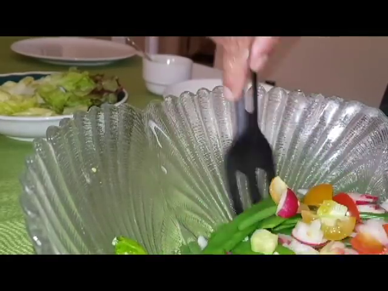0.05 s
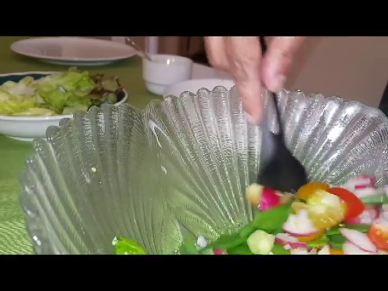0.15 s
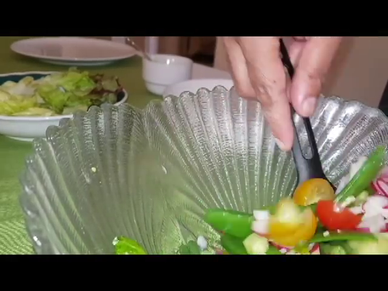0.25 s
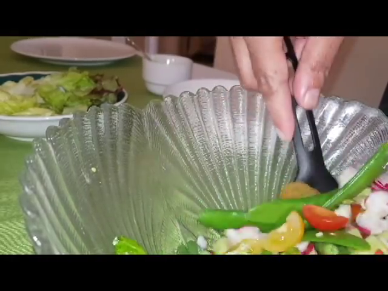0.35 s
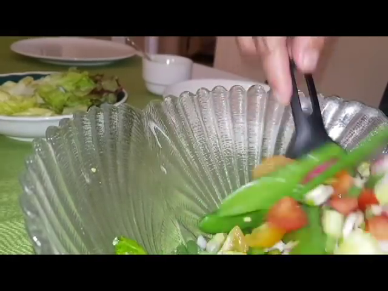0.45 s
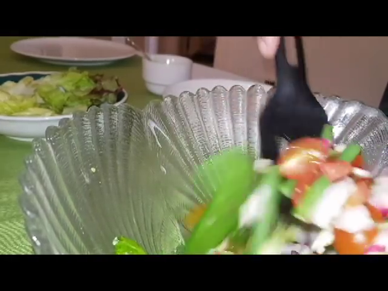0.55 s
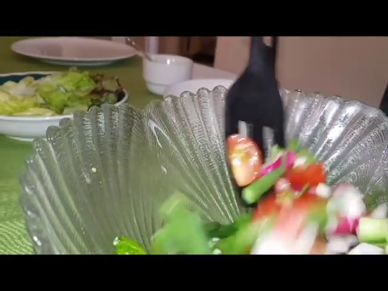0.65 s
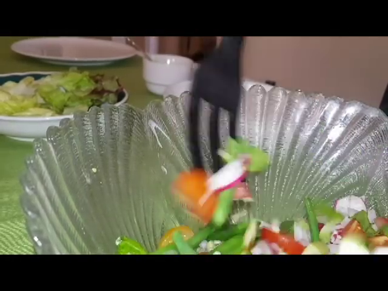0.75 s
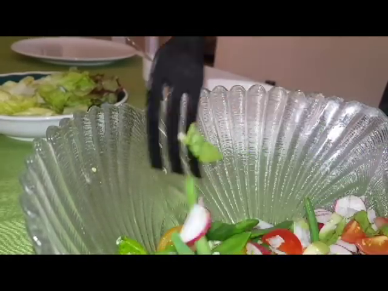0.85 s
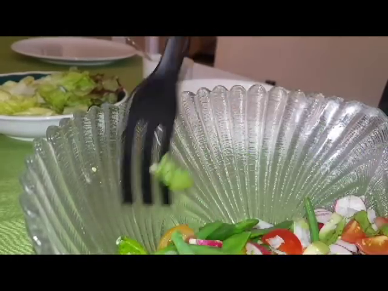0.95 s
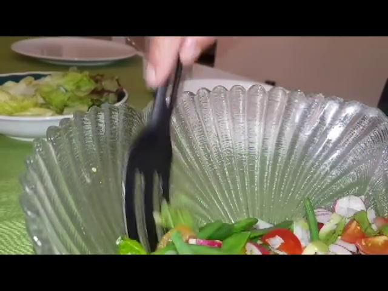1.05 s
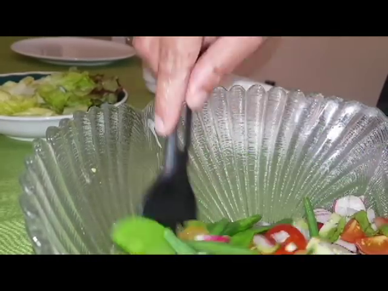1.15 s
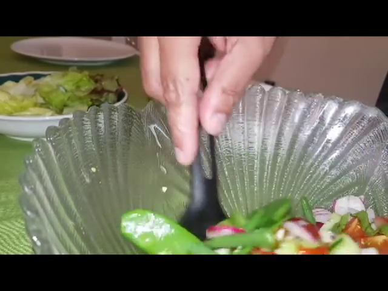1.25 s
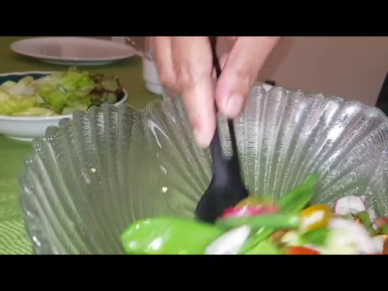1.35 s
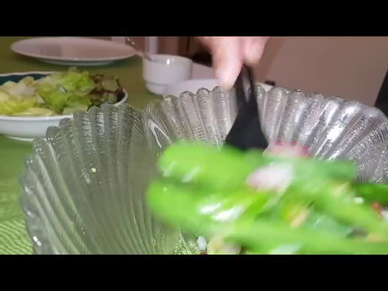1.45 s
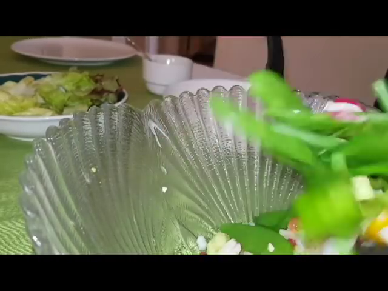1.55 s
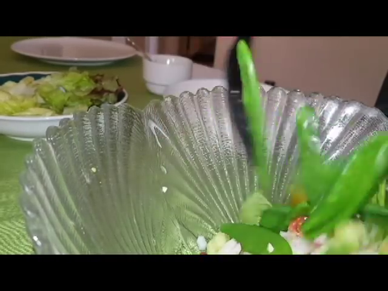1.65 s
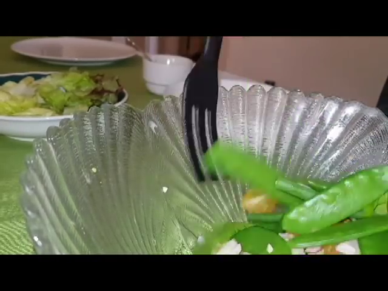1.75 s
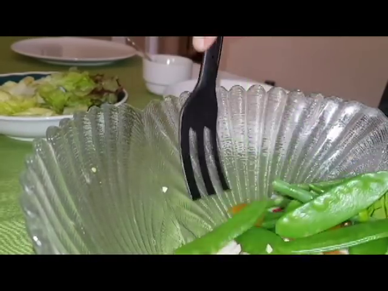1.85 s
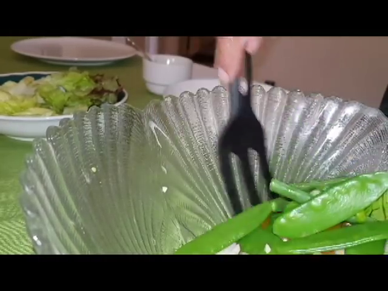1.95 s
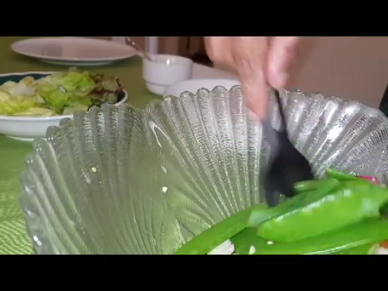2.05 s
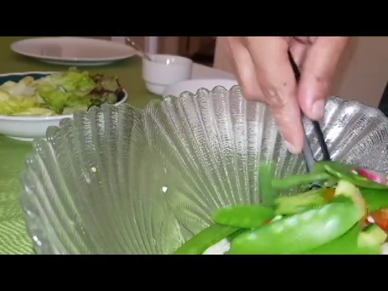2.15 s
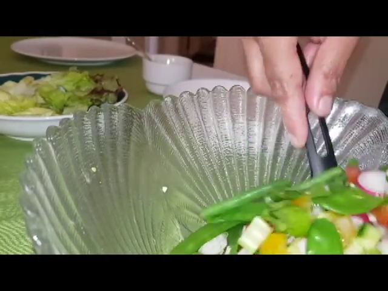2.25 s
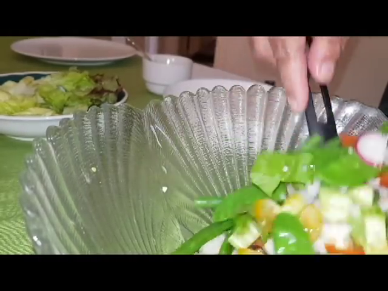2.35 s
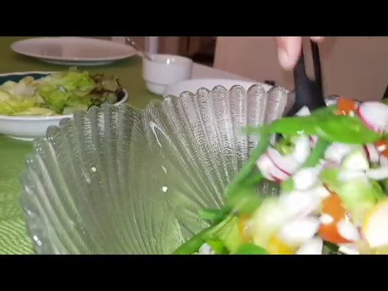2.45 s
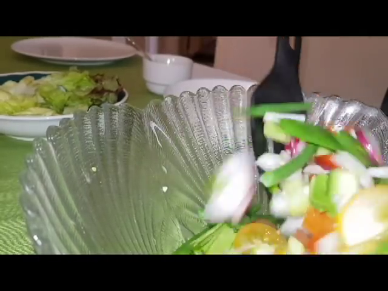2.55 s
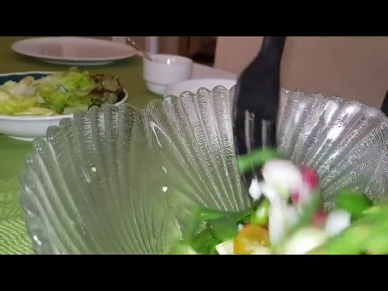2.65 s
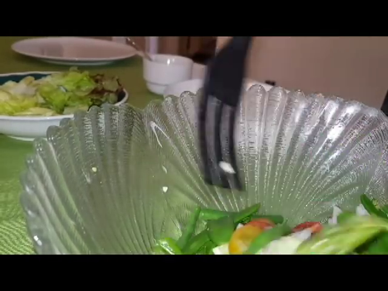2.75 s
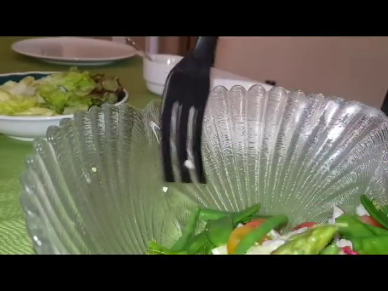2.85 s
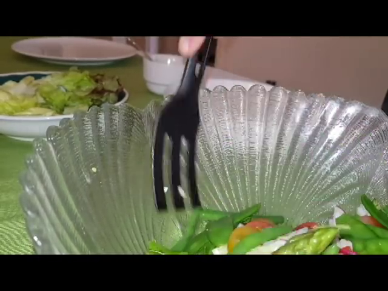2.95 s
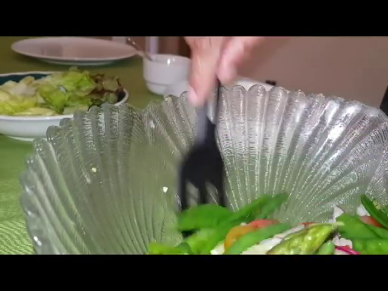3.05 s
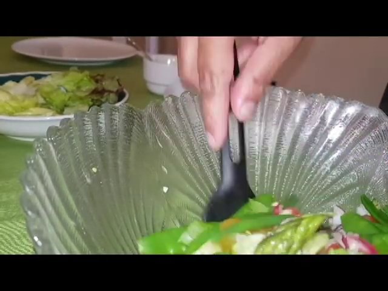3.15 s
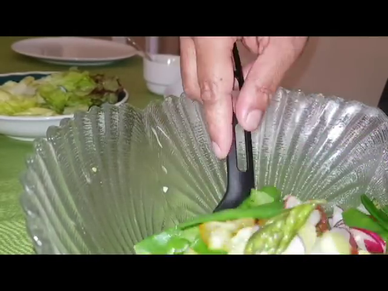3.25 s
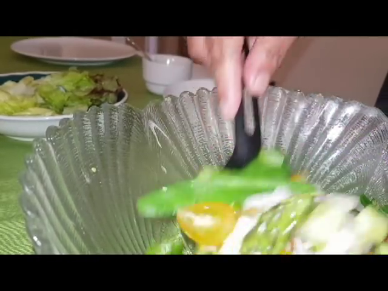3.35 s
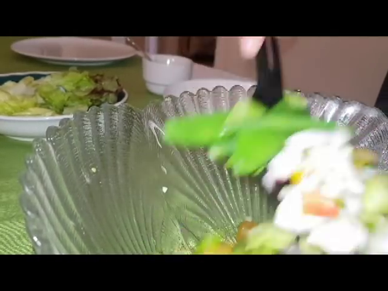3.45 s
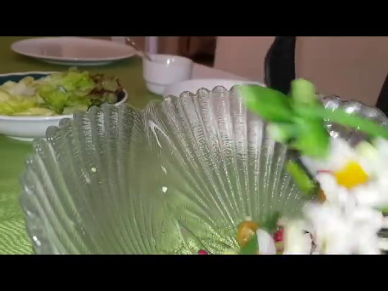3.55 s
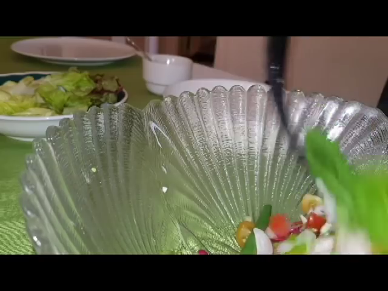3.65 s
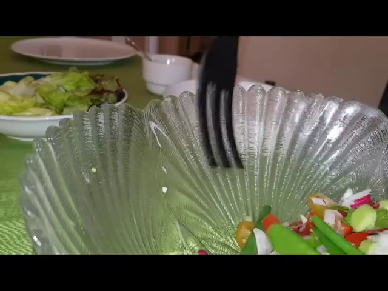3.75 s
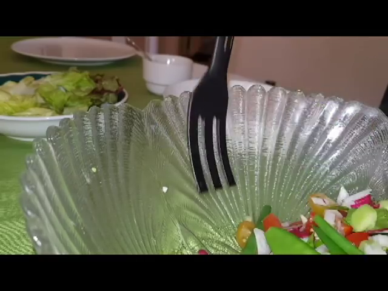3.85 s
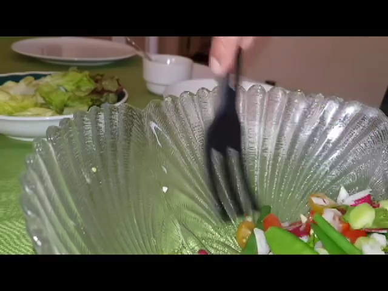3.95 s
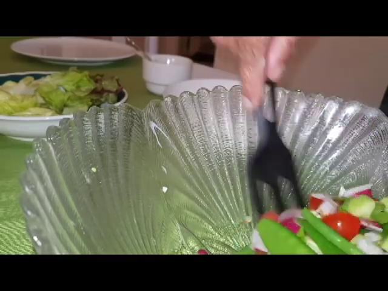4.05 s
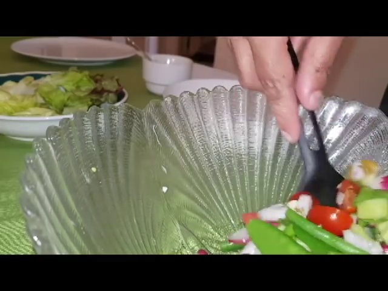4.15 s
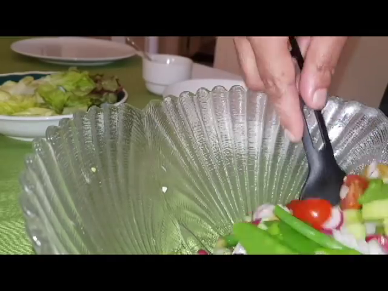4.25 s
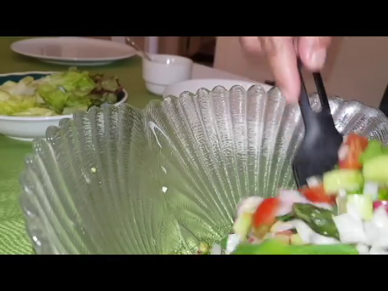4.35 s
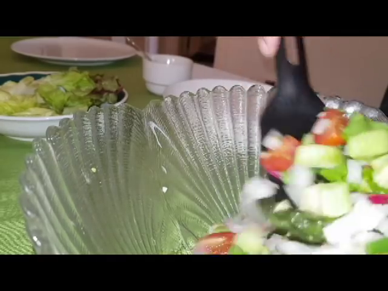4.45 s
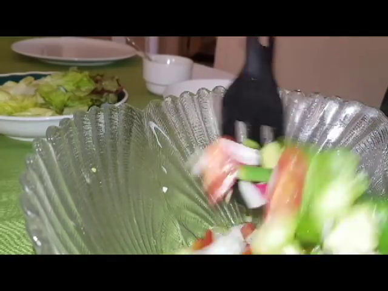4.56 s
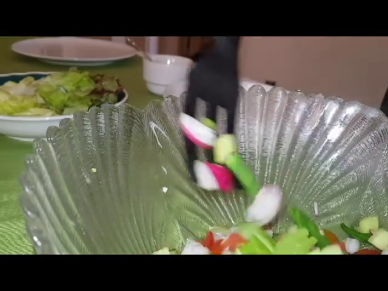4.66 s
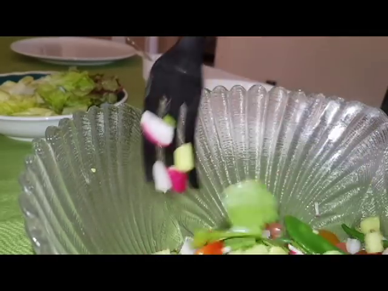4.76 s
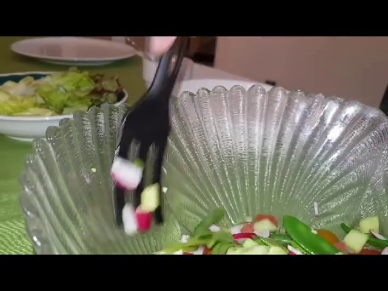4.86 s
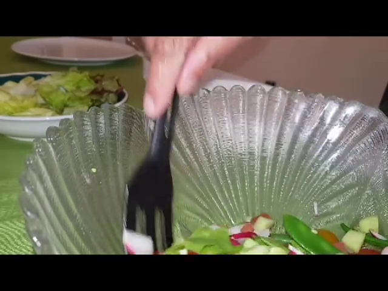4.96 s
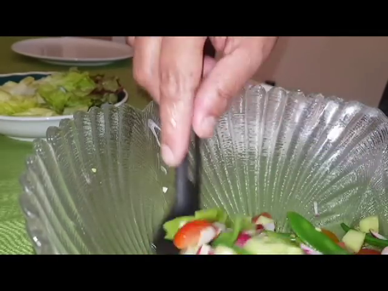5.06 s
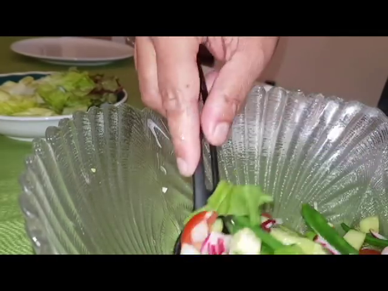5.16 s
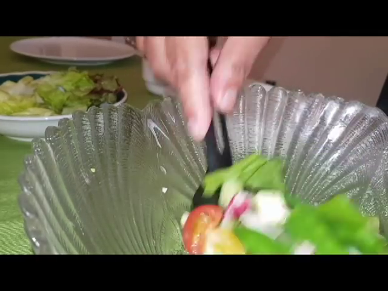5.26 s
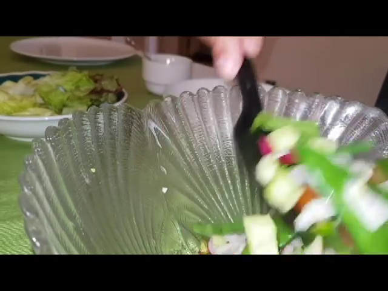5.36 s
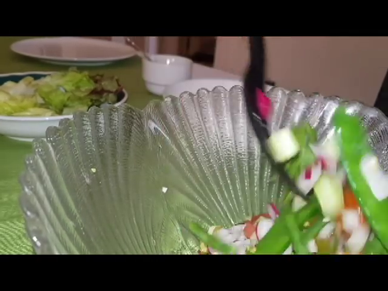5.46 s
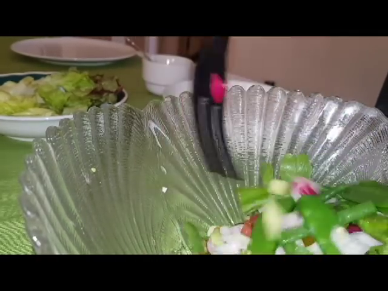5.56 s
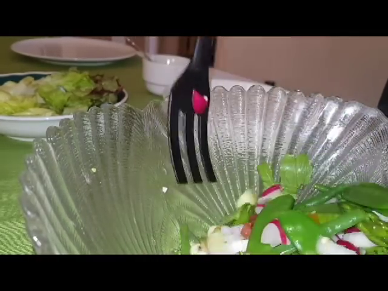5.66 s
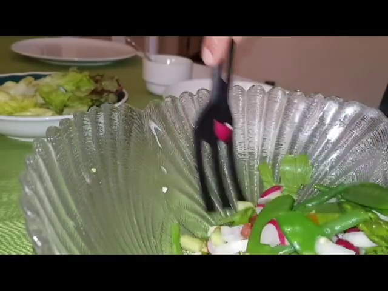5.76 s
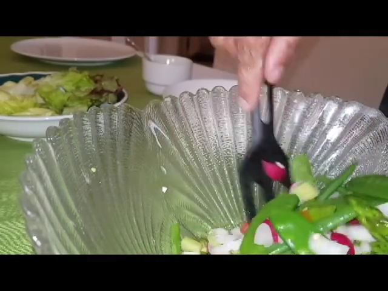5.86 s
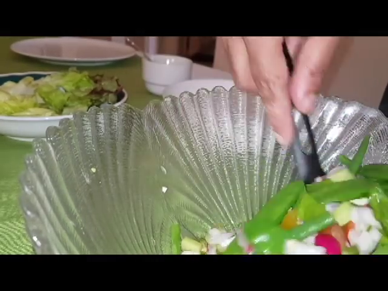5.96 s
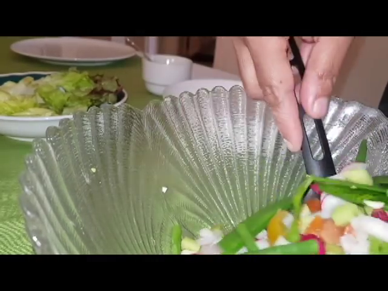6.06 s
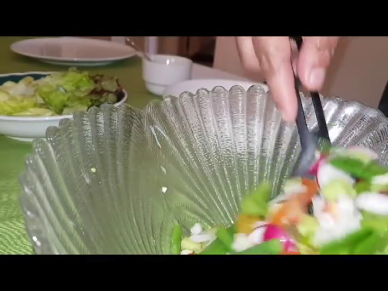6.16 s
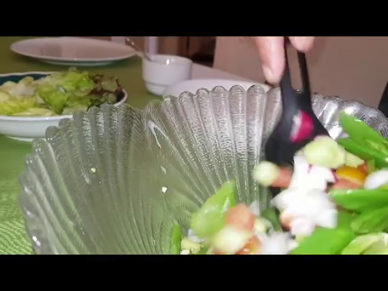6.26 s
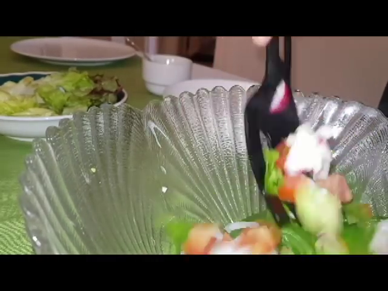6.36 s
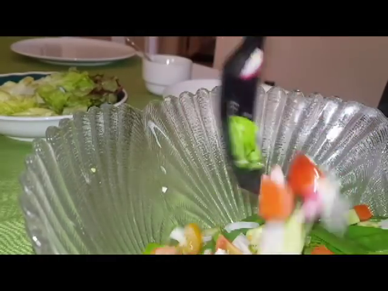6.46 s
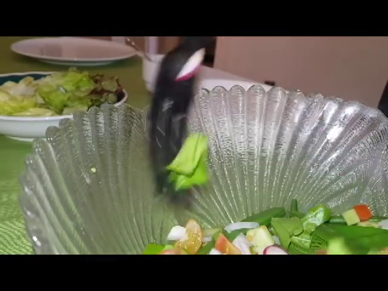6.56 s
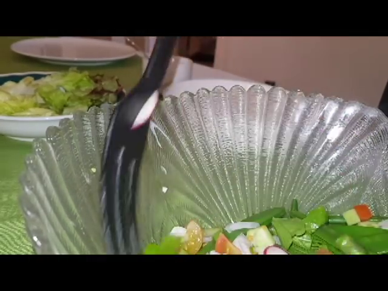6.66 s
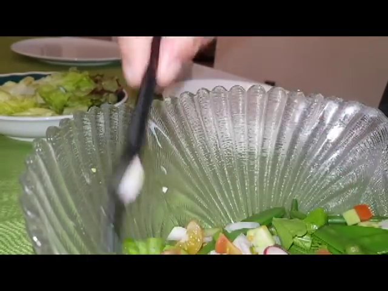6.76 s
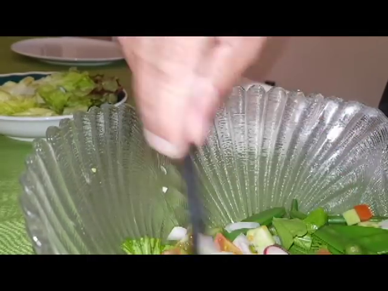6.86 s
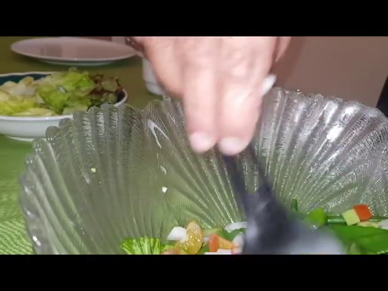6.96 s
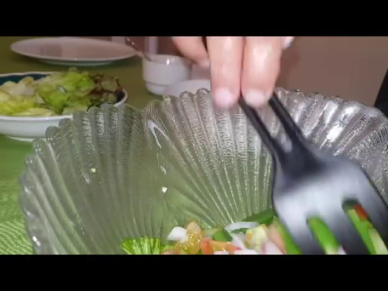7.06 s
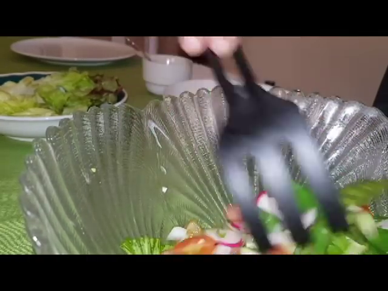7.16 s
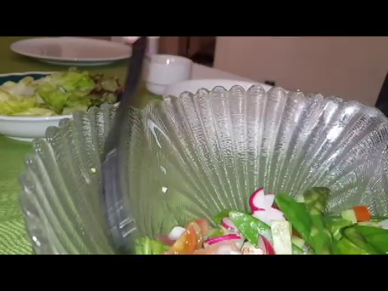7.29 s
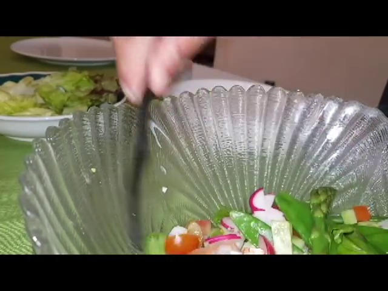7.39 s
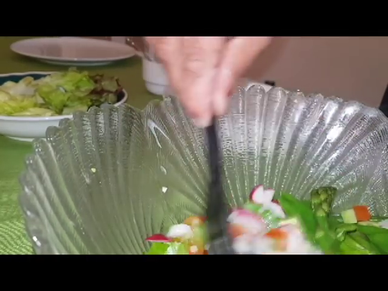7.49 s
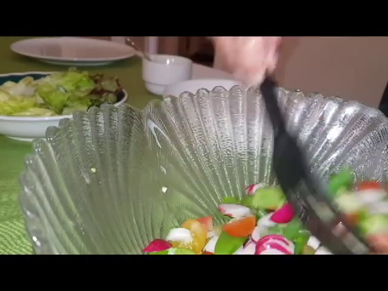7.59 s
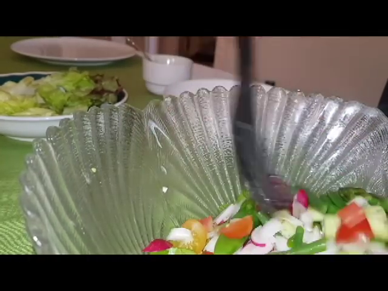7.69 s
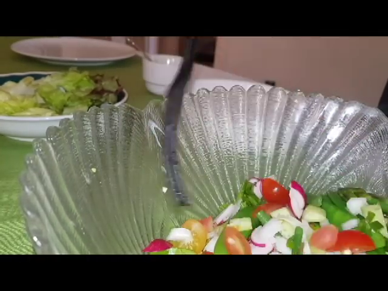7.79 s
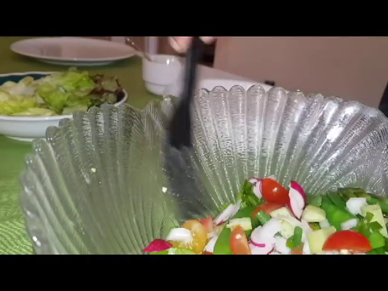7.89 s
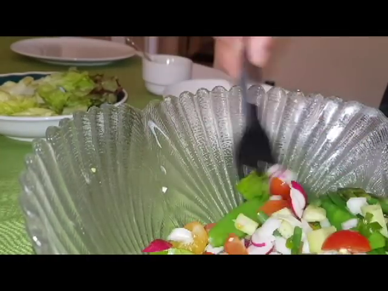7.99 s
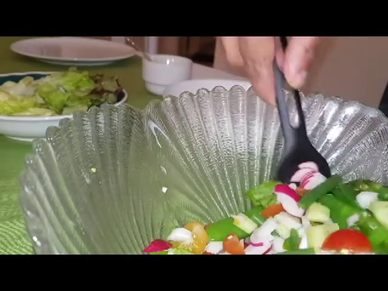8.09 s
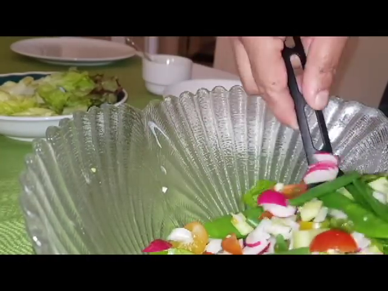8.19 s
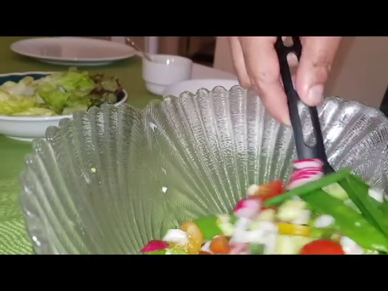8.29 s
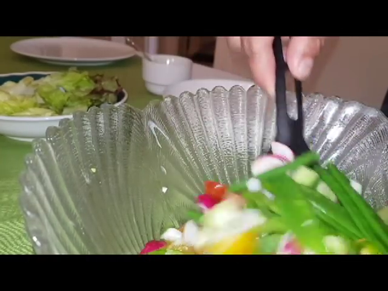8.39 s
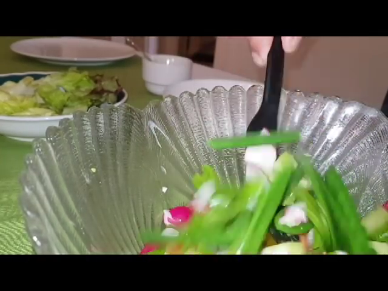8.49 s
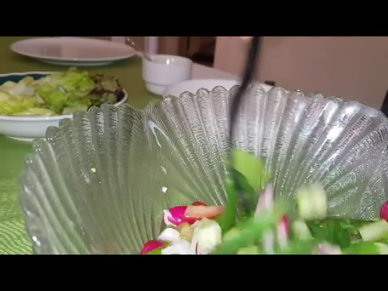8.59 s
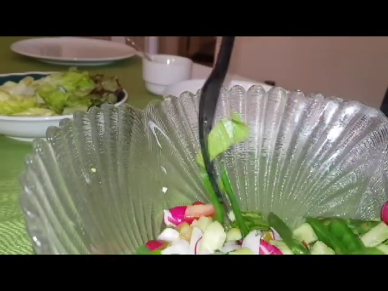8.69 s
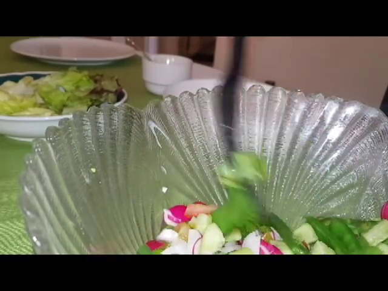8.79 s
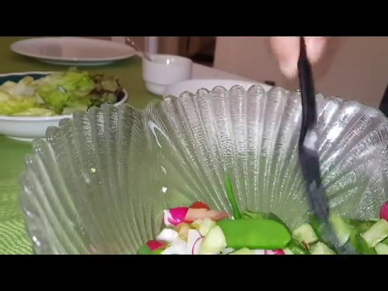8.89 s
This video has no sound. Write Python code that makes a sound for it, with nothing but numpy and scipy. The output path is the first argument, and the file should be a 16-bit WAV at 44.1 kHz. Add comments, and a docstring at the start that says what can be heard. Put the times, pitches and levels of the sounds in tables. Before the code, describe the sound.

A plastic fork tosses wet raw vegetables in a ribbed glass bowl, close to stereo microphones in a small kitchen with a low wavering hum and faint hiss. It opens mid-stroke with rustle, scraping and light ticks until 0.3 s, then soft falling pieces. At 1.0 s the fork knocks the glass and digs, with a dull tap at 1.3. Sharper double clinks at 1.85 s ring the bowl; pieces tumble to 2.7. A strong clack and ring comes at 2.95 s, others at 3.9, with a crisp snap at 4.17. More strokes follow at 4.88 and 5.72 s, each with crunchy rustle, ticks and soft thuds. The stroke at 6.78 s is faint. Clicks at 7.37 and 7.4 lead to clinks at 7.8 and 7.9 s, the last ringing brightest, then rustle and muffled drops near 8.5 s fade into hum.

```python
"""A plastic salad fork tosses raw vegetables in a ribbed glass bowl, close to a camera with two microphones.
Fork and hard pieces click on the glass: noise bursts, short resonances and brief upper glass modes.
Firm blows ring the bowl as decaying sines in beating pairs.
Wet vegetables thud, scrape and rustle as grainy filtered noise; the kitchen gives a low hum,
a faint hiss and a short echo of the contacts."""
import sys
import numpy as np
from scipy import signal
from scipy.fft import rfft, irfft, next_fast_len
from scipy.io import wavfile
from scipy.ndimage import uniform_filter1d, map_coordinates

SR = 44100
rng = np.random.default_rng(int(sys.argv[2]) if len(sys.argv) > 2 else 0)


def inscribe(sig):
    """Save sig as 16-bit PCM at rate SR to the path in sys.argv[1].

    A 1-D sig is mono; a 2-D sig holds one channel per row.
    Samples are clipped to [-1, 1] before scaling.
    """
    pcm = np.round(np.clip(np.atleast_2d(sig).T, -1, 1) * 32767)
    wavfile.write(sys.argv[1], SR, pcm.astype(np.int16))


N = 393813

# modes of the glass bowl, low to high: [pitch_hz]
BOWL_HZ = np.array([322, 736.5, 1281, 1339, 1998, 2774, 2832, 3698, 4689, 12110])
# how each mode rings, with its close twin: [t60_s, left_minus_right_db, left_lead_rad,
# twin_offset_hz, twin_left_db, twin_right_db], twin levels relative to the mode
BOWL_MODES = [(1.6, 2.5, 1.66, -26.5, -2.5, -2.5), (2.07, -7, 4, 7, -2, -9),
              (1.2, 2.5, 2.16, 2, -31.5, -32), (1.06, 6.5, -1.1, 3.5, -31.5, -29.5),
              (0.83, 4, 2, 7, -12, -8.5), (0.57, 7.5, -0.8, -12.5, -32.5, -29),
              (0.52, -3.5, 1.3, -1.5, -28.5, -26), (0.37, 5, -1.07, 18, -13, -8),
              (0.15, 1, 8.5, 25.5, -15.5, -14), (0.064, -1.5, 1.5, 28.5, -16, -26)]


def amp(db):
    """Decibels to amplitude."""
    return 10 ** (np.asarray(db) / 20)


def unit(x):
    """Scale to an rms of 1."""
    return x / np.sqrt(np.mean(x ** 2) + 1e-20)


def along(points, hz):
    """Interpolate (Hz, value) points on a log frequency axis."""
    f, v = np.transpose(points)
    return np.interp(np.log(hz + 1), np.log(f + 1), v)


def curves(rows):
    """One value per sample for each column after the time."""
    s, *cols = np.transpose(rows)
    return [np.interp(np.arange(N) / SR, s, c) for c in cols]


def wobble(rate):
    """A smooth random curve, rate knots a second."""
    knots = rng.standard_normal(int(N * rate / SR) + 4)
    return map_coordinates(knots, [np.arange(N) * rate / SR])


def filtered(x, response):
    """Filter x by a complex response of frequency."""
    m = next_fast_len(x.shape[-1] + 8192)
    spectrum = rfft(x, m) * response(np.fft.rfftfreq(m, 1 / SR))
    return irfft(spectrum, m)[..., :x.shape[-1]]


def resonance(hz, width_hz):
    """Response of one damped mode, 1 at its peak."""
    return lambda f: 1j * f * width_hz / (hz * hz - f * f + 1j * f * width_hz)


def sides(db):
    """Left and right gains for a level difference."""
    return amp([[db / 2], [-db / 2]])


def grainy(per_second, spread_db, share, patchy_db):
    """Stereo noise of rms 1 in patches of random gain, with sparse spikes of very unequal size in it."""
    spikes = (rng.random(N) < per_second / SR) * amp(spread_db * rng.exponential(size=N))
    puff = amp(-60 * np.arange(200) / SR / 0.0042)  # t60 4.2 ms
    puffs = signal.fftconvolve(spikes, puff)[:N]
    noise = rng.standard_normal((2, N)) * (1 + share * unit(puffs))
    z = signal.stft(noise, nperseg=256)[2]
    # random gains, smoothed over frequency and then time
    field = uniform_filter1d(rng.standard_normal(z.shape[1:]), size=12, axis=0)
    field = uniform_filter1d(field, size=4, axis=1)
    return unit(signal.istft(z * amp(patchy_db * unit(field)), nperseg=256)[1][:, :N])


def bowl():
    """Each blow starts all modes afresh and chokes what rang before; close twins make the ring beat."""
    # blows that ring the bowl: [start_s, strength_db, hardness_db_per_octave, place_round_rim_deg,
    # top_mode_db, damping_by_food (1 = usual), sense (start of the 2832 Hz mode: 1 upright, -1 inverted)]
    blows = [(0, -47.5, 6.1, 22.6, -77, 1.34, 1), (1.003, -40.5, 2.5, 17, -53, 0.82, 1),
             (1.847, -39.5, 6.8, -11.5, -42, 1.4, 1), (1.872, -38, 7.4, -35.5, -30, 1.34, 1),
             (2.951, -31, 8.9, -30.5, -40, 0.83, -1), (3.882, -34.5, 10.7, -5.8, -69, 1.04, 1),
             (3.931, -46, 3.8, 17.5, -63, 1.7, 1), (4.876, -40.5, 4.6, 16, -30, 0.9, 1),
             (5.726, -34.5, 2.1, 36, -45, 1.23, 1), (6.776, -56.5, 15.3, -31.5, -52, 1.04, 1),
             (7.366, -55, 3.7, -3, -40.5, 1.2, 1), (7.397, -40.5, 7.4, -11.5, -56, 1.16, 1),
             (7.795, -38.5, 8.6, -6.6, -60, 1.1, -1), (7.898, -27.5, 9.7, 32.5, -10, 1.19, -1)]
    # vibration pattern of each mode but the top one: [waves_round_rim, turn_deg, even_blow_db]
    patterns = [(2, 162, 3.5), (3, 27, 0), (4, 40, -4), (4, 49.5, -2.5), (5, 77, -1.5), (6, 75, -0.5),
                (6, 74.6, -0.5), (7, 56, 4), (8, 39, 3.5)]
    node_db = -25  # what is left of a mode struck on its node

    out, hz = np.zeros((2, N)), BOWL_HZ[:, None]
    t60, pan_db, lead, split, *twin_db = np.array(BOWL_MODES).T[:, :, None]
    waves, pattern, even_db = np.transpose(patterns)
    # a mode radiates in lobes, unequal at the two microphones: the left one's share of the power
    left = 1 / (1 + 1 / amp(pan_db) ** 2)
    food = np.array([wobble(30) for _ in BOWL_MODES])  # pieces touching the wall unsettle each mode
    starts = [round(max(row[0], 0) * SR) for row in blows] + [N]
    for (s, db, hardness, place, top_db, damping, sense), a, b in zip(blows, starts, starts[1:]):
        angle = np.radians(np.round(waves) * place - pattern)
        swing = np.hypot(np.cos(angle), amp(node_db))
        struck_db = db + even_db + hardness * np.log2(BOWL_HZ[:-1] / 2000)
        start = np.append(amp(struck_db) * swing, amp(top_db))
        t = np.arange(min(b - a, SR)) / SR  # one second at most
        # food slides back onto the glass and smothers the high tails first
        lost_db = 60 * damping * t / t60 + hz / 50 * t ** 2
        shaky_db = 1.2 * food[:, a:a + len(t)]
        onset = 1 - np.exp(-t / 0.0022)
        fade = start[:, None] * amp(shaky_db - lost_db) * onset
        fade *= np.where(hz == BOWL_HZ[6], np.sign(sense), 1)
        for ear, share, turn, twin in zip(out, (left, 1 - left), (lead / 2, -lead / 2), twin_db):
            mode = np.sin(2 * np.pi * hz * t + turn)
            pair = mode + amp(twin) * np.sin(2 * np.pi * (hz + split) * t + turn)
            ear[a:a + len(t)] = np.sum(np.sqrt(2 * share) * fade * pair, 0)
    return out


def stirring():
    """Levels in dB of thuds, prongs and rustle: strokes start at once, sag, release; tumbles swell and die."""
    # the fork digs under the heap: [start_s, length_s, thuds_at_start_db, prongs_at_start_db,
    # prongs_at_end_db, rustle_at_start_db]
    strokes = [(-0.1, 0.086, -50, -54, -56, -43.5), (1.003, 0.25, -51, -67, -50, -46),
               (1.852, 0.27, -57, -56, -53.5, -47.5), (2.947, 0.23, -50, -59, -51.5, -45),
               (3.892, 0.33, -57.5, -76, -46, -53), (4.879, .2, -50.5, -61.5, -61, -47),
               (5.718, .26, -53, -55, -53, -50), (6.78, .26, -67.5, -73, -86, -59),
               (7.368, 0.097, -52.5, -47.5, -52, -45.5), (7.801, 0.07, -58, -65, -58, -55.5),
               (7.901, 0.39, -53.5, -62, -57.5, -47.5)]
    # lifted pieces tumble back: [peak_s, swell_by_20_db_s, die_by_20_db_s, thuds_db, prongs_db, rustle_db]
    tumbles = [(0.248, 0.23, 0.11, -54, -48.5, -42.5), (.46, 1.3, 0.13, -73.5, -72, -60.5),
               (0.668, 0.22, 0.2, -60, -67.5, -58.5), (.93, 0.2, 1.5, -76, -76, -67.5),
               (1.62, .5, 0.4, -59, -67, -57.5), (2.1, 0.05, 0.14, -54.5, -56, -51.5),
               (2.4, .5, 0.6, -68, -73, -60), (2.711, 0.2, .09, -53.5, -63, -55.5),
               (3.45, 0.5, .5, -63, -71, -62), (3.739, .5, 0.08, -59.5, -58.5, -58),
               (4.581, 1, 0.37, -66.5, -75, -61.5), (5.2, 0.07, 0.67, -65.5, -69, -61.5),
               (5.47, 0.04, 0.22, -55, -64.5, -57), (5.97, 0.19, 0.16, -59, -57, -49),
               (6.15, 0.3, 0.5, -75.5, -89, -64.5), (6.419, 0.06, 0.26, -56.5, -63.5, -59),
               (6.64, .4, 0.35, -62, -82, -62.5), (7.13, 0, .2, -70.5, -83.5, -69),
               (7.34, 0.1, 0.5, -65, -86, -72), (7.65, 0.48, 1.27, -64, -64, -63),
               (8.6, 0.38, 0.14, -57, -75, -60)]
    thuds_sag, rustle_sag, release = 41, 19, 144  # dB per second: two while digging, the last after

    t, power = np.arange(0, N, 32) / SR, 1e-12
    for s, length, thud_db, first_db, last_db, rustle_db in strokes:
        dig = np.clip(t - s, 0, length)  # seconds dug so far
        prongs_db = first_db + (last_db - first_db) * dig / length
        db = [thud_db - thuds_sag * dig, prongs_db, rustle_db - rustle_sag * dig]
        released_db = release * np.maximum(t - s - length, 0)
        power = power + (t >= s) * amp(db - released_db) ** 2
    for s, rise, fall, *db in tumbles:
        away_db = 20 * np.maximum((s - t) / rise, (t - s) / fall)
        power = power + amp(np.array(db)[:, None] - away_db) ** 2
    return curves(np.transpose([t, *10 * np.log10(power)]))


def vegetables():
    """Pieces thud softly, prongs scrape the ribs, wet skins crackle; the thuds keep the bowl murmuring."""
    # spectrum of the soft thuds, relative: [pitch_hz, level_db_per_hz]
    thud_shape = [(200, -29.5), (380, -3), (620, 0.5), (900, -6.5), (1160, 1), (1450, -8.5), (2200, -11),
                  (3500, -37)]
    # resonances of the scraping prongs, each applied twice: [pitch_hz, width_hz, level_db]
    prong_modes = [(2745, 580, 5), (4600, 340, 1)]
    # spectrum of the rustling skins, relative: [pitch_hz, level_db_per_hz]
    rustle_shape = [(1760, -40), (3000, -13), (3510, -5.5), (3610, -5), (3910, -5), (11800, -8),
                    (15500, -18), (16200, -22.5), (16500, -45.5)]

    thud_db, scrape_db, rustle_db = stirring()
    lumps_db = 3 * wobble(45)
    tumble = grainy(200, 2.5, .5, 3)
    thuds = amp(thud_db + lumps_db) * unit(filtered(tumble, lambda f: amp(along(thud_shape, f))))

    prongs = lambda f: sum(amp(db) * resonance(c, w)(f) ** 2 for c, w, db in prong_modes)
    uneven_db = 2.3 * wobble(60)
    scrape = amp(scrape_db + uneven_db) * unit(filtered(grainy(80, 3.6, 0.75, 3.4), prongs))

    crackle = grainy(300, 4, .6, 2.5)
    flutter_db = 1.5 * wobble(70)
    rustle = amp(rustle_db + flutter_db) * unit(filtered(crackle, lambda f: amp(along(rustle_shape, f))))

    # the five lowest bowl modes; 2.2 / t60 is a mode's width in Hz
    ears = np.array([[1], [-1]])
    glass = lambda f: sum(resonance(c, 2.2 / t60)(f) * sides(db) * np.exp(1j * lead / 2 * ears)
                          for c, (t60, db, lead, *_) in zip(BOWL_HZ[:5], BOWL_MODES))
    murmur = amp(8.0) * filtered(thuds[0], glass)
    return thuds + scrape + rustle + murmur


def kitchen():
    """A low wavering hum, its bass nearly alike at both microphones, over a faint hiss."""
    # spectrum of the hum, relative: [pitch_hz, level_db_per_hz]
    hum_shape = [(15, -27), (25, -9.5), (42, -7), (65, -12), (82, -1), (105, -8.5), (123, 3.5), (135, -3),
                 (150, -1.5), (175, -10), (215, -8.5), (260, -14.5), (380, -23.5), (600, -52.5),
                 (1100, -120)]
    # slow course of the hum: [time_s, level_db]
    hum_level = [(0.0, -57.5), (0.6, -54), (4.25, -55.5), (5.25, -57.5), (7.81, -56), (8.93, -59.5)]
    # spectrum of the hiss, relative: [pitch_hz, level_db_per_hz]
    hiss_shape = [(180, -17.5), (300, -4), (399, -0.5), (970, -15), (1170, -5), (1740, -19.5),
                  (8580, -15.5), (15200, -19.5), (16500, -43.5)]
    # likeness of the hum at the two microphones: [pitch_hz, correlation]
    alike = [(30, 0.94), (130, 0.9), (290, 0.92), (640, 1), (15000, 0.057)]

    # mid = cos(turn) and side = sin(turn) give a left-right correlation of cos(2 turn)
    turn = lambda hz: np.arccos(np.clip(along(alike, hz), -1, 1)) / 2
    split = lambda hz: amp(along(hum_shape, hz)) * [np.cos(turn(hz)), np.sin(turn(hz))]
    mid, side = filtered(rng.standard_normal((2, N)), split)
    waver_db = 1.5 * wobble(5)
    stereo = unit(np.array([mid + side, mid - side])) * sides(2.2)
    hum = amp(curves(hum_level)[0] + waver_db) * stereo
    hiss = unit(filtered(rng.standard_normal((2, N)), lambda hz: amp(along(hiss_shape, hz))))
    return hum + amp(-72.5) * hiss


def body(mode, db, noise):
    """One short resonance of a contact: part tone, part rattle, with a quicker first decay."""
    snap_db, snap_faster = 1.5, 4.84  # level of the quick decay over the slow one, and times its speed
    (c, w, life), t = mode, np.arange(noise.shape[1]) / SR
    pitch = c + 0.11 * w * rng.standard_normal()
    turn = rng.normal(0, c / 3500, (2, 1))  # phases at the two microphones differ more for high modes
    tone = np.sin(2 * np.pi * pitch * t + turn)
    rattle = unit(filtered(2.1 * noise[0] + noise[1:], resonance(c, w)))
    fade = amp(db - 60 * t / life) + amp(db + snap_db - 60 * snap_faster * t / life)
    onset = 1 - np.exp(-t / 0.00026)
    return fade * (0.59 * tone + 0.35 * rattle) * onset


def contacts():
    """A click, four short rings, a treble spray and the upper glass modes, different at each microphone."""
    # brief upper modes of the glass, under every hard contact: [pitch_hz, relative_level_db, t60_s]
    shimmer = [(5880, -8.5, 0.14), (6570, -10, 0.16), (7160, -13.5, .08), (7120, -5, 0.078),
               (7900, -3.5, 0.1), (8100, -3.5, 0.037), (8970, 3, 0.057), (9330, -5, 0.053),
               (9650, -10, 0.092), (10660, -7, 0.064), (10950, -5, 0.079), (13100, -20.5, .05)]
    # short resonances of a contact, a dull thud, the bowl's hollow and two of the fork's prongs:
    # [centre_hz, width_hz, t60_s]
    bodies = [(667, 260, 0.036), (1177, 380, 0.04), (2734, 290, 0.046), (4470, 960, 0.038)]
    # hard contacts: [start_s, click_db, hollow_knock_db, low_prong_db, high_prong_db, treble_db,
    # left_minus_right_db]
    hard_contacts = [(0.147, -33, -65, -68, -51.5, -36, 6.5), (0.1733, -35, -60, -52.5, -44, -45, 13.5),
                     (0.2634, -31.5, -47, -59.5, -49.5, -45.5, 10.5),
                     (0.7636, -44.5, -57.5, -80, -79.5, -51.5, 1.5),
                     (1.0026, -23.5, -21.5, -48, -39.5, -25, -4.5),
                     (1.0106, -20, -34, -47.5, -51, -20.5, 5), (1.0144, -16.5, -33, -41.5, -43, -18.5, 4),
                     (1.124, -22, -44.5, -57, -62, -39, -2), (1.2762, -33.5, -42.5, -22.5, -34.5, -60, 4),
                     (1.505, -32, -52, -63.5, -51, -45, -1.5), (1.5945, -23.5, -52.5, -63, -46, -46.5, 0),
                     (1.6823, -38.5, -52.5, -63.5, -50.5, -52.5, -.5),
                     (1.847, -14.5, -34.5, -35, -19, -22, -2), (1.8731, -1, -31, -47, -26, -15, -1.5),
                     (2.0718, -21.5, -55, -43.5, -30.5, -43.5, 4.5),
                     (2.1252, -28.5, -45.5, -31, -44, -41.5, .5),
                     (2.443, -45.5, -58, -76, -45.5, -58.5, 4.5), (2.9495, -10, -23, -39, -26, -21, -.5),
                     (2.966, 2, -34.5, -49, -18.5, -19.5, 1), (3.139, -22.5, -39.5, -34.5, -38.5, -39, 1),
                     (3.3384, -31, -63, -58.5, -54.5, -64, -3.5), (3.3898, -45, -60, -43, -84, -75.5, 5),
                     (3.475, -47, -41, -73, -74, -62, 4.5), (3.592, -44, -59.5, -52, -66.5, -49.5, -4.5),
                     (3.6638, -20.5, -46.5, -63.5, -63, -37.5, 2),
                     (3.8804, -24.5, -34.5, -40, -54.5, -52.5, -1.5), (3.931, 2, -40, -40.5, -33, -20, 3),
                     (4.0975, -35, -47.5, -44, -57.5, -41, 1), (4.108, -33.5, -51.5, -43.5, -43, -36.5, 3),
                     (4.1242, -22, -53, -30.5, -37, -37, .5), (4.1659, 5.5, -77, -25, -39.5, -43, 0.5),
                     (4.1743, -26.5, -62, -29, -65, -53.5, 3.5),
                     (4.8752, -13.5, -22.5, -45.5, -49.5, -21.5, -3),
                     (4.8878, -9.5, -39, -38.5, -48.5, -10.5, 4), (5.0463, -23.5, -46, -40.5, -45, -42, 0),
                     (5.0933, -7, -44.5, -38.5, -38.5, -31.5, -2.5),
                     (5.702, -36.5, -43.5, -45, -47, -54.5, 2.5), (5.7268, -6, -33, -37, -29.5, -24.5, -1),
                     (5.9387, -32.5, -64.5, -45.5, -36.5, -44, 7.5),
                     (5.9489, -23.5, -65, -42.5, -36, -43, -.5),
                     (5.9568, -28.5, -57, -37.5, -38.5, -47, -2.5),
                     (6.4043, -51, -46.5, -45, -69.5, -52.5, 0), (6.4593, -47, -47, -50.5, -60.5, -51, 0.5),
                     (6.5802, -60, -46, -86, -78, -69, -4), (6.7772, -30, -54.5, -77.5, -68, -30.5, -.5),
                     (6.792, -40, -60, -68, -62.5, -29.5, -1), (7.3656, -18.5, -40.5, -67, -55, -15.5, -1),
                     (7.3964, -4.5, -26.5, -40, -21, -24.5, -2.5), (7.5694, -41, -62, -48.5, -59.5, -58, 3),
                     (7.7085, -31.5, -56.5, -64.5, -56, -51, 2.5),
                     (7.7948, -13, -31.5, -55, -18, -24, -2.5),
                     (7.898, 0, -29.5, -40.5, -19.5, -14.5, -1.5)]
    # dull thuds of heavy pieces: [start_s, level_db]
    drops = [(0.264, -45), (1.276, -36), (1.873, -30), (3.931, -39), (7.708, -52), (8.4762, -38),
             (8.519, -41.5)]
    thud_db = -15  # thud relative to the knock
    spray_hz, spray_scatter = 8760, .15  # treble centre and its chance spread (log units)

    out, t = np.zeros((2, N + SR)), np.arange(SR // 8) / SR
    hz, level_db, t60 = np.array(shimmer).T[:, :, None]
    bright = lambda f: f ** 2 / (f - 3500j) ** 2 / (1 + 1j * f / 12000) ** 2
    for s, click_db, knock_db, low_db, high_db, treble_db, pan_db in hard_contacts:
        noise = rng.standard_normal((3, len(t)))  # one shared, then one for each microphone
        air = filtered(0.23 * noise[0] + 0.53 * noise[1:], bright)
        click = amp(-60 * t / .003) * air
        sound = 0.4 * amp(click_db) * click / abs(click).max()

        centre = spray_hz * np.exp(spray_scatter * rng.standard_normal())
        spray = unit(filtered(air, resonance(centre, 0.51 * centre)))
        sound += amp(treble_db - 60 * t / 0.014) * spray

        body_db = (knock_db + thud_db, knock_db, low_db, high_db)
        sound += sum(body(mode, db, noise) for mode, db in zip(bodies, body_db))

        chance = rng.standard_normal((2, len(hz), 2))  # level and phase of each mode at each microphone
        fade = amp(level_db + 4.4 * chance[..., :1] - 60 * t / t60)
        modes = fade * np.sin(2 * np.pi * hz * t + 3 * chance[..., 1:])
        sound += amp(treble_db - 15) * modes.sum(1)
        out[:, round(s * SR):][:, :len(t)] += sound * sides(pan_db)
    for s, db in drops:
        out[:, round(s * SR):][:, :len(t)] += body(bodies[0], db, rng.standard_normal((3, len(t))))
    return out[:, :N]


def walls(x):
    """The room answers with a noise tail in which each frequency dies at its own speed."""
    # decay of the kitchen: [pitch_hz, t60_s]
    room_decay = [(200, 0.16), (2000, 0.42), (12000, 0.13)]
    hz, t, z = signal.stft(rng.standard_normal((2, SR // 2)), SR, nperseg=256)
    fade = amp(-60 * t / along(room_decay, hz)[:, None])
    tail = signal.istft(z * fade, SR, nperseg=256)[1]
    late = np.pad(x, ((0, 0), (200, 0)))  # the answer starts 200 samples (4.5 ms) late
    return signal.fftconvolve(late, tail / np.linalg.norm(tail[0]), axes=1)[:, :N]


def scene():
    """Contacts and their echo, the ringing bowl, the vegetables and the kitchen together."""
    hits = contacts()
    echo = amp(-17) * walls(hits)
    return hits + echo + bowl() + vegetables() + kitchen()


def record(dry):
    """The camera keeps nothing above its band limit."""
    return filtered(dry, lambda hz: hz < 16200)


dry = scene()
out = record(dry)
inscribe(out)
```